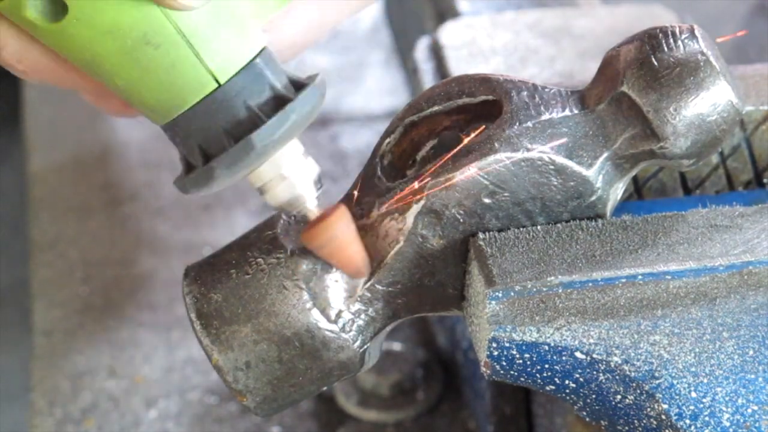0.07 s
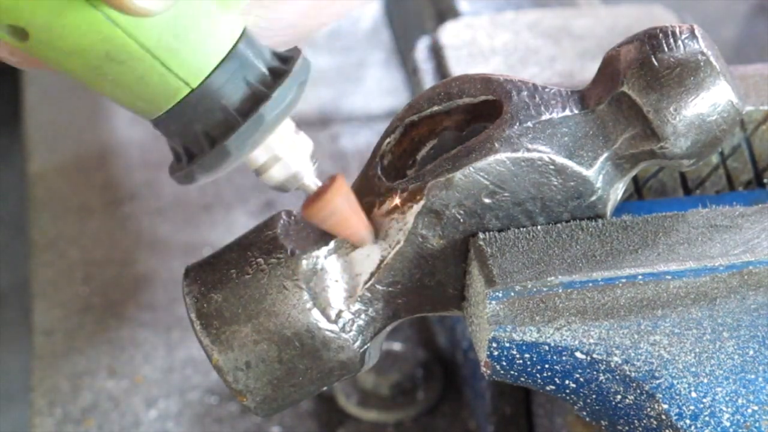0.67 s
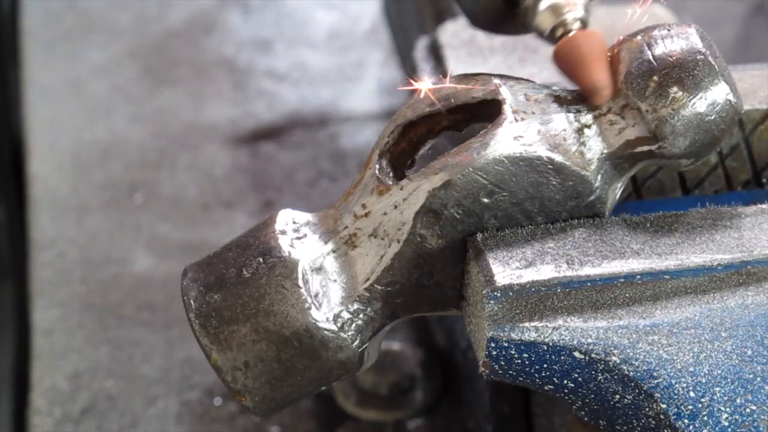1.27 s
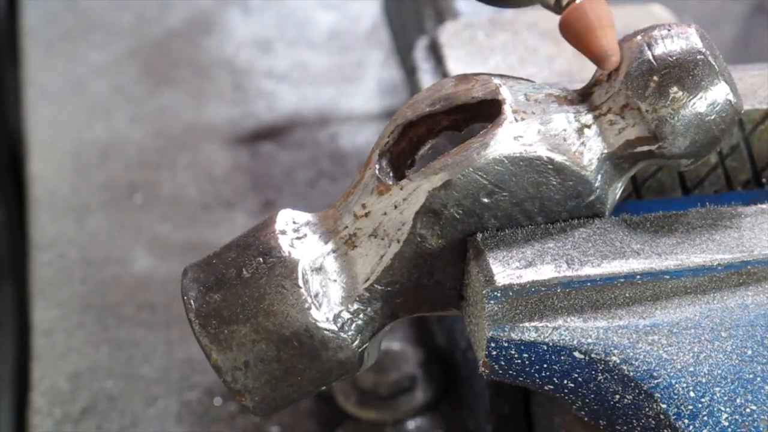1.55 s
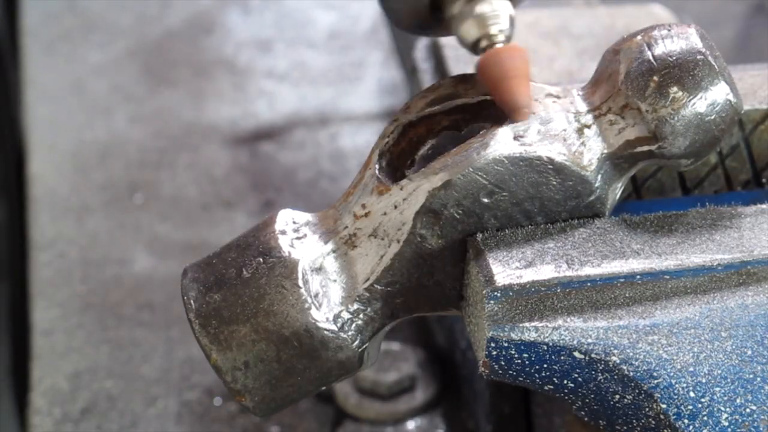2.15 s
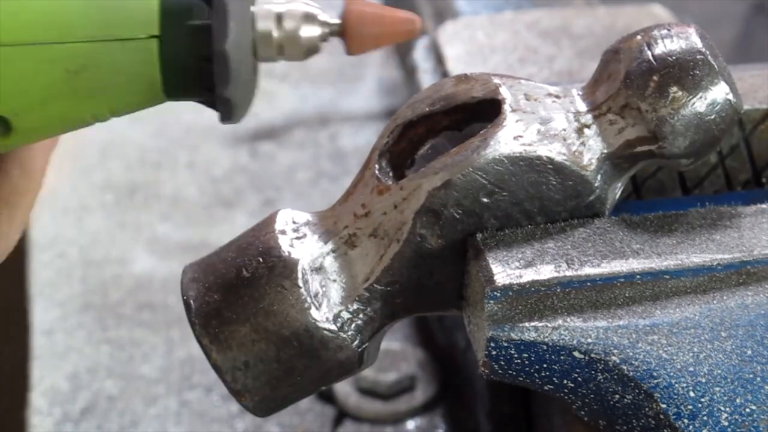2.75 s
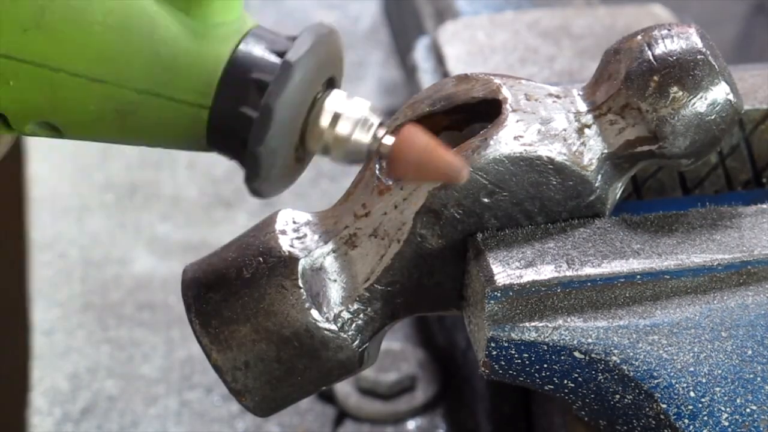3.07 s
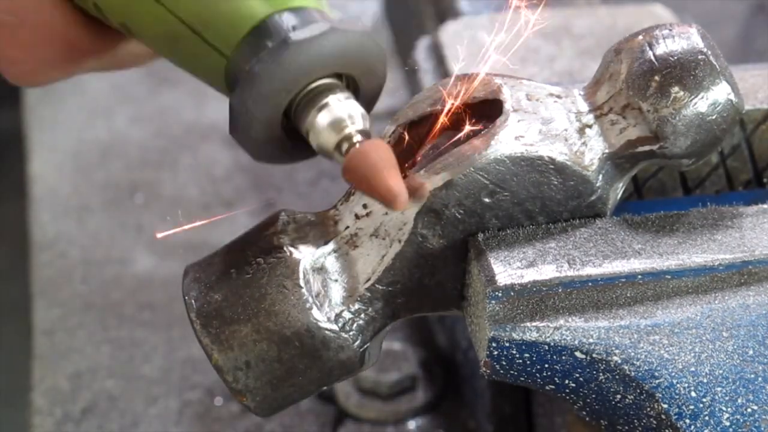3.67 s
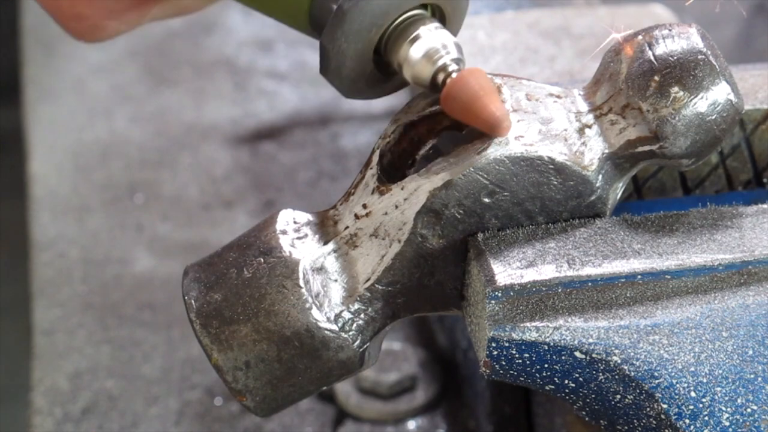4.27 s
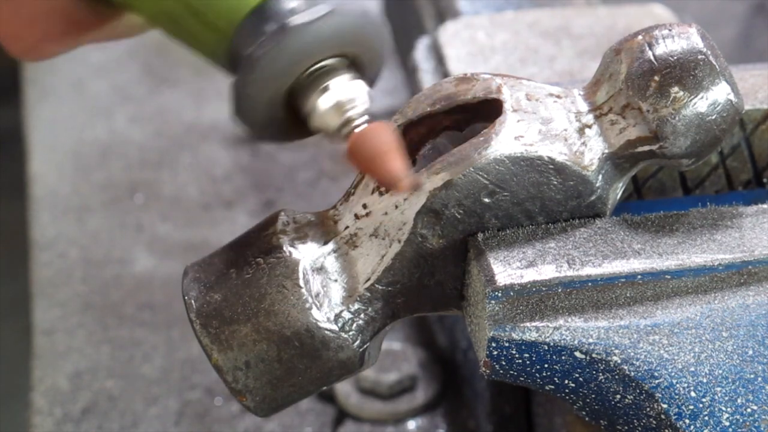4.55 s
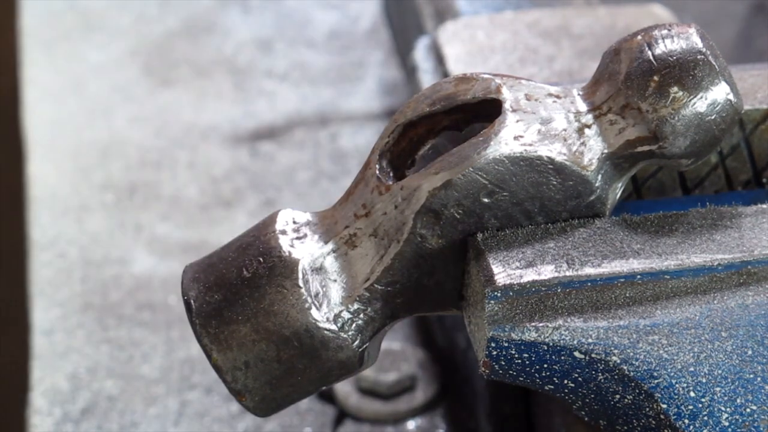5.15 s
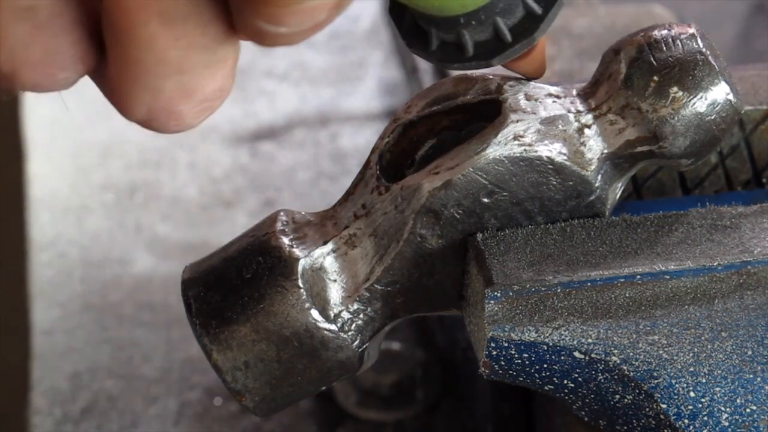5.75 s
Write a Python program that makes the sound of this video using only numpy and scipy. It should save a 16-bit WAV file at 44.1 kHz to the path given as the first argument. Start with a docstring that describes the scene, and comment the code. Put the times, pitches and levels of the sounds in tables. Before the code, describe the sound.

A small electric grinder runs throughout with a high whine and airy fan hiss, heard up close in a workshop. Light scraping on a steel hammer head gives way, after a click, to rough, ringing chatter that slows the motor. The tool spins up freely with a soft puff of air on the microphone, grinds again in gritty, squealing strokes, runs free once more and touches the steel lightly.

```python
"""A handheld rotary tool grinds rust off a steel hammer head held in a vice, in a small workshop.
First the shaft hums, the motor whines and the fan hisses. The stone skips over the hammer's cheek,
scraping and squealing once a turn. At 0.9 s the sound jumps with a click; the stone chatters in the neck,
ringing the steel and dragging the speed down. Lifted, the tool speeds up and its exhaust brushes the
microphone. Last it grinds the eye and the shoulder, runs free again and returns lightly to the eye."""
import sys
import numpy as np
from scipy import signal
from scipy.fft import rfft, irfft
from scipy.io import wavfile
from scipy.ndimage import uniform_filter1d

SR = 44100
rng = np.random.default_rng(int(sys.argv[2]) if len(sys.argv) > 2 else 0)


def to_wav(s):
    """Save 16-bit WAV."""
    ch = np.atleast_2d(s).T  # columns
    pcm = np.round(np.clip(ch, -1, 1) * 32767)  # PCM
    wavfile.write(sys.argv[1], SR, pcm.astype(np.int16))


N = 256220
TIME = np.arange(N) / SR
BINS = np.fft.rfftfreq(N, 1 / SR)
MAINS_HZ = 50
RIPPLE_PHASE = 2 * np.pi * 2 * MAINS_HZ * TIME  # torque ripples at twice the mains frequency
FAN_REF_DB = -45.5  # reference for the fan air and the weaker motor tones

# shaft speed; the pitch steps down abruptly at 0.9 s and elsewhere sags with load: time_s, speed_hz
SHAFT_SPEED = [(0.0, 532), (0.17, 536), (0.31, 521), (0.44, 518), (0.58, 505.5), (0.9, 500.5), (0.905, 490),
               (1.22, 473), (1.4, 450), (1.51, 443.5), (1.55, 459), (1.7, 472), (1.86, 488.5), (2.0, 485.5),
               (2.22, 473), (2.42, 470.5), (2.5, 505), (2.6, 519), (2.78, 532), (3.0, 532), (3.07, 526),
               (3.34, 530), (3.43, 522), (3.58, 488), (3.73, 482), (3.85, 496), (4.02, 488), (4.15, 506),
               (4.28, 489.5), (4.69, 487), (4.85, 474.5), (4.93, 478), (5.1, 511.5), (5.55, 509.5),
               (5.81, 506)]
# level of the vents; it jumps up at 0.9 s and elsewhere follows where they face: time_s, gain_db
VENT_LEVEL = [(0.0, -9), (0.22, -3.5), (0.55, -14.5), (0.9, -12.5), (0.905, -0.5), (1.35, -1), (2.44, -4),
              (2.7, 5), (3.02, 4.5), (3.04, -1), (3.27, 6), (3.55, -0.5), (4.0, 0), (4.5, 1), (4.76, -7.5),
              (5.05, 0.5), (5.37, 4.5), (5.69, 1.5), (5.81, 3.5)]
# balance of the tool's sounds; at 0.9 s the hum drops abruptly, elsewhere it shifts with the grip:
# start_s, change_s, hum_db, loaded_whine_db and companion_db (both relative to the load),
# weak_tones_db and hollow_db (both relative to the fan), free_whine_db
TOOL_BALANCE = [(0.0, 0.03, -37.5, -3, 0, -2, -2, -53), (0.3, 0.052, -36.5, -14, -11, 2, -13, -48),
                (0.46, 0.055, -32.5, -1, -3, 7.5, 2.5, -51), (0.902, 0.0053, -43, -1, -17, -12.5, -15, -48),
                (1.55, 0.023, -66, 1, -14, -12, -25, -51), (1.87, 0.024, -59, 0, -2, -25, -23, -58),
                (2.12, 0.025, -45.5, 3.5, -15, -16, -21, -37), (2.34, 0.067, -60, -8, -5, -4.5, -11, -40),
                (2.62, 0.058, -44, 11, -10, -4.5, -9, -39.5), (2.87, 0.042, -37, 14, -2, 0.5, -4, -38.5),
                (3.02, 0.014, -39, 1.5, -8, -5.5, -6, -40.5),
                (3.38, 0.032, -44.5, -3, -6, -1.5, -28, -54.5),
                (4.08, 0.032, -41.5, -11, -21, -0.5, -25, -53), (4.24, 0.027, -37, -6, -10, -16, -29, -54),
                (4.72, 0.024, -39, -32, -34, -3, -31, -45), (5.06, 0.03, -38, -7, -8, -4.5, -7, -46),
                (5.28, 0.098, -34, -7, -14, 3.5, -1, -43), (5.56, 0.11, -41.5, 5.5, -12, 1, -0.5, -46)]
# presses of the stone on the steel: start_s, end_s, place, scrape_db (3-7 kHz), treble_db (above 7 kHz,
# relative to the scrape), grit_db (relative to the scrape tones), squeal_order, squeal_db
STONE_STROKES = [ (0.14, 0.18, "cheek", -43.5, 3, -7, 8, -55),
                 (0.21, 0.302, "cheek", -44.5, 4.5, -5, 2, -63),
                 (0.325, 0.426, "cheek", -44, 2.5, 3, 3, -65),
                 (0.44, 0.56, "cheek", -41.5, -3, -17, 7, -69),
                 (0.554, 0.628, "cheek", -45, 2, -2, 7, -48.5), (0.652, 0.687, "cheek", -46, 3, -5, 7, -39),
                 (0.695, 0.776, "cheek", -44, -3.5, -13, 8, -52),
                 (0.78, 0.886, "cheek", -42.5, -0.5, -11, 14, -50),
                 (0.903, 1.073, "neck", -37, -1.5, -7, 12, -45),
                 (1.086, 1.242, "neck", -36.5, -12, -8, 8, -51),
                 (1.262, 1.38, "neck", -36.5, -11, -8, 10, -48),
                 (1.383, 1.484, "neck", -33.5, -5.5, -8, 13, -49.5),
                 (1.511, 1.757, "neck", -36.5, 0.5, -14, 6, -53),
                 (1.781, 1.86, "neck", -39, -2.5, -20, 11, -44),
                 (1.864, 2.094, "neck", -37.5, 1.5, -6.5, 12, -38),
                 (2.09, 2.205, "neck", -37, 0.5, -7, 11, -35),
                 (2.209, 2.304, "neck", -37, 0.5, -6, 10, -41),
                 (2.3, 2.403, "neck", -37, -2, -20, 11, -31.5), (3.136, 3.297, "eye", -36, -28, -6, 6, -50),
                 (3.29, 3.471, "eye", -36, -3, -1, 9, -42.5), (3.484, 3.653, "eye", -34, -8, -3, 14, -49),
                 (3.667, 3.79, "eye", -38, -7, -2, 14, -45), (3.838, 3.933, "eye", -35.5, -6.5, -7, 6, -66),
                 (3.946, 4.043, "eye", -39, -6.5, -2, 3, -52.5),
                 (4.089, 4.252, "eye", -33.5, -5, -1.5, 11, -49),
                 (4.254, 4.384, "eye", -33, -4, -14, 12, -42), (4.41, 4.537, "eye", -34.5, -5, 0.5, 8, -46),
                 (4.541, 4.691, "shoulder", -32.5, -1, -4, 12, -56),
                 (4.684, 4.775, "shoulder", -36, 0.5, 3, 11, -39),
                 (4.785, 4.834, "shoulder", -36.5, -0.5, -7, 5, -40),
                 (4.838, 4.875, "shoulder", -31, -3, 0, 13, -36),
                 (5.38, 5.65, "eye", -43, 1.5, 3, 9, -46.5), (5.716, 5.813, "eye", -45.5, 9, -9, 13, -40), ]
# response of the steel at the hammer's shoulder: frequency_hz, gain_db
SHOULDER_RESPONSE = [(280, -25), (700, -17), (980, -12), (1500, -18), (2000, -5.5), (2400, -4),
                     (3000, -4.5), (3500, -9), (4300, -3), (4900, 1.5), (5400, 4), (6300, 6), (6800, 3),
                     (7500, 5.5), (8400, 6.5), (9000, 6), (9700, -5), (11500, -21), (15500, -35)]


def amp(db):
    """Amplitude ratio of a level in decibels."""
    return 10 ** (np.asarray(db) / 20)


def unit_rms(x):
    """The signal scaled to unit mean power."""
    return x / np.sqrt(np.mean(abs(x) ** 2) + 1e-20)


def spectrum(points):
    """A table interpolated over log frequency to every bin."""
    hz, value = np.transpose(points)
    return np.interp(np.log(BINS + 1), np.log(hz), value)


def curve(points):
    """A table interpolated over time to every sample."""
    return np.interp(TIME, *np.transpose(points))


def held(rows):
    """A table's columns at every sample, each row holding until the next slides in."""
    start, change, *columns = np.transpose(rows)
    knots = np.column_stack([start - abs(change) / 2, start + abs(change) / 2]).ravel()[1:]
    return [np.interp(TIME, knots, np.repeat(column, 2)[:-1]) for column in columns]


def filtered(x, gain):
    """Linear filtering: each frequency bin is multiplied by its gain."""
    return irfft(rfft(x) * gain, N)


def noise(gain):
    """White noise through a filter."""
    return filtered(rng.standard_normal(N), gain)


def highpass(hz):
    """Gain that passes only what lies above hz."""
    return 1 / (1 + (hz / (BINS + 1)) ** 16)


def band_rms(x, low_hz, high_hz):
    """RMS amplitude within one band."""
    return np.std(filtered(x, (BINS > low_hz) & (BINS < high_hz)))


def wander(hz):
    """Low-pass random motion of unit RMS, at rates up to about hz."""
    rates = np.fft.rfftfreq(N // 32, 32 / SR)
    knots = irfft(rfft(rng.standard_normal(N // 32)) / (1 + (rates / hz) ** 2))
    return np.interp(TIME, np.linspace(0, TIME[-1], len(knots)), unit_rms(knots))


def sway(db, hz):
    """Random amplitude modulation, spanning db either way."""
    return unit_rms(amp(db * np.tanh(wander(hz))))


def shaft_angle(flutter=0.001946, flutter_hz=28):
    """Phase is the integral of speed; inertia rounds the speed's changes and a slight flutter remains."""
    speed = uniform_filter1d(curve(SHAFT_SPEED), size=1000)
    return 2 * np.pi * np.cumsum(speed * (1 + flutter * wander(flutter_hz))) / SR


def hum(angle, load, db_per_hz=0.2964, knee_hz=483.7, reference_hz=512.7, shake_hz=12):
    """Rotating unbalance radiates at the shaft frequency, louder at speed and shaken by contact."""
    speed, vent_db = curve(SHAFT_SPEED), curve(VENT_LEVEL)
    level_db = held(TOOL_BALANCE)[0] + db_per_hz * (np.maximum(speed, knee_hz) - reference_hz)
    sideband = amp(-22 + 0.55 * vent_db) * np.sin(angle + RIPPLE_PHASE)
    steady = amp(level_db + 0.59 * vent_db) * sway(db=2, hz=12.3) * (np.sin(angle) + sideband)
    shake_level = np.hypot(amp(-62), amp(-29) * load)
    shake = wander(shake_hz) * np.sin(angle) + wander(shake_hz) * np.cos(angle)
    return np.sqrt(2) * (steady + shake_level * shake)


def whine(angle, load, waver_db=3, loaded_waver_db=8, slip_rad=0.5, ripple_depth=0.19):
    """Shaft harmonics, modulated by torque ripple; the 7th and 8th grow with the load."""
    # weaker motor tones, before the housing: shaft_order, relative_db
    weak_tones = [(2, -6.5), (3, -8.5), (4, -10), (5, -11), (6, -10), (7, -7.5), (9, 0), (10, -4), (11, 1),
                  (12, -1), (14, -1)]
    # thin high whistles, before vent level and housing: shaft_order, level_db
    whistles = [(16, -48), (18, -52.5)]
    # response of the plastic housing: frequency_hz, gain_db
    housing = [(900, -30), (1020, -5), (1350, -2), (1560, 4), (2500, -5.5), (7400, -4), (8150, -0.5),
               (8600, -9), (9000, 0.5), (9500, -0.5)]
    _, loaded_db, companion_db, weak_db, _, free_db = held(TOOL_BALANCE)
    vent_db = curve(VENT_LEVEL)
    # phase modulation spreads the free whine into sidebands, widest at high speed
    swing_rad = np.interp(curve(SHAFT_SPEED), [480, 530], [0.35, 1.2])
    tones = amp(free_db) * np.sin(8 * angle + swing_rad * np.sin(RIPPLE_PHASE)) * sway(waver_db, 25)
    loaded_level = load * amp(loaded_db) * sway(loaded_waver_db, 34)
    tones += loaded_level * np.cos(8 * angle + slip_rad * wander(45))
    companion_level = load * amp(companion_db) * sway(loaded_waver_db, 33)
    tones += companion_level * np.sin(7 * angle + slip_rad * wander(40))
    for order, db in weak_tones:
        level = amp(FAN_REF_DB + vent_db + weak_db + db) * sway(waver_db, 34)
        tones += level * np.sin(order * angle + 2 * np.pi * rng.random() + slip_rad / 2 * wander(40))
    for order, db in whistles:
        tones += amp(db + vent_db) * sway(waver_db, 25) * np.sin(order * angle + 2 * np.pi * rng.random())
    ripple = unit_rms(1 + ripple_depth * np.cos(RIPPLE_PHASE))
    return np.sqrt(2) * filtered(tones, amp(spectrum(housing))) * ripple


def fan(trim_db=-2, ripple_depth=0.03, hollow_hz=1360, hollow_width_hz=670):
    """Turbulence hisses at the vents, with a cavity resonance where the hand cups them."""
    # spectrum of the cooling air: frequency_hz, density_db
    air_spectrum = [(60, -20), (330, -15.5), (480, -8.5), (760, -8), (1050, -1.5), (1600, 2.5), (2200, 6),
                    (3100, 2), (4400, 3.5), (6000, 8.5), (8400, 3.5), (9600, -2), (11500, -14),
                    (15500, -29.5)]
    air = noise(amp(spectrum(air_spectrum)))
    air /= band_rms(air, 1100, 2800)
    hollow = unit_rms(noise(1 / (1 + (2 * (BINS - hollow_hz) / hollow_width_hz) ** 4)))
    hollow_db = held(TOOL_BALANCE)[4]
    level = amp(FAN_REF_DB + curve(VENT_LEVEL) + trim_db) * (1 + ripple_depth * np.cos(RIPPLE_PHASE))
    return level * (air + amp(hollow_db) * hollow)


def workshop_rumble(level_db=-76, incoherent_db=-16):
    """Ambient noise: a faint low rumble, nearly the same in both channels."""
    # spectrum of the rumble: frequency_hz, density_db
    rumble_spectrum = [(20, -3.5), (48, 5), (90, -8), (140, -7), (180, 2), (230, -23), (280, 3), (380, -34),
                       (1000, -43), (15000, -44)]
    white = rng.standard_normal(N) + amp(incoherent_db) * rng.standard_normal((2, N))
    return amp(level_db) * unit_rms(filtered(white, amp(spectrum(rumble_spectrum))))


def reverberation(x, response, t60_s, echoes_per_s=3000):
    """Diffuse reflections decay exponentially, in a different pattern in each channel."""
    echoes = rng.standard_normal((2, N)) * (rng.random((2, N)) < echoes_per_s / SR)
    echoes = echoes * amp(-60 * TIME / t60_s) * (TIME > 0.002)
    echoes /= np.linalg.norm(echoes, axis=1, keepdims=True)
    tail = filtered(echoes, amp(spectrum(response)))[:, :SR // 2]
    return signal.fftconvolve(x[None], tail, axes=1)[:, :N]


def contact(start_s, end_s, attack_s=0.017, release_s=0.023, graze_db=-14, graze_s=0.045):
    """Contact pressure rises and relaxes exponentially; the stone still grazes as it lifts."""
    after, graze = np.maximum(TIME - end_s, 0), amp(graze_db)
    bite = 1 - np.exp(-np.clip(TIME - start_s, 0, 1) / attack_s)
    release = (1 - graze) * np.exp(-np.minimum(after, 2) / release_s)
    return bite * (release + graze * np.exp(-after / graze_s))


def skipping(depth=0.3, rate_hz=28):
    """A lightly held stone skips unevenly, modulating the contact pressure."""
    return unit_rms(1 + depth * np.cos(2 * np.pi * rate_hz * TIME + 2.9 * wander(15)))


def stone_profile(angle, bump_phases, drift=0.65, drift_hz=20, slip=0.35, slip_hz=60):
    """Periodic forcing: bumps pass every turn; the contact drifts, so each harmonic swells alone."""
    force = np.zeros(N)
    for order in range(2, len(bump_phases)):
        smear = slip * order / 10
        gain = 1 + drift * (wander(drift_hz) + 1j * wander(drift_hz)) + 1j * smear * wander(slip_hz)
        harmonic = (gain * np.exp(1j * (order * angle + bump_phases[order]))).real
        force += harmonic / np.sqrt(1 + 2 * drift ** 2 + smear ** 2)
    return unit_rms(force)


def grit(angle, turn_depth=0.27, grain_db=1.5):
    """Abrasion noise: grains tear at the rust, hardest when the stone's high side comes round."""
    grains = rng.standard_normal(N) * amp(grain_db * np.minimum(rng.exponential(1, N), 5))
    return unit_rms(grains * (1 + turn_depth * np.cos(angle)))


def steel(force, response, split_hz=7000):
    """Forced vibration of the steel at one place, as body and treble, each normalised."""
    sound = filtered(force, amp(spectrum(response)))
    treble = filtered(sound, highpass(split_hz))
    return np.array([(sound - treble) / band_rms(sound, 3000, split_hz), unit_rms(treble)])


def scrape(profile, grains, pressures, bounce_db=0.86, flicker_db=1.0, bounce_hz=28):
    """Source and filter: bumps and grit drive the steel at each press as the tool bounces in the hand."""
    # response of the steel at three places on the hammer: frequency_hz, gain_db
    cheek = [(700, -41), (1000, -10), (1500, 6), (2000, -0.5), (2500, 2), (3050, -8.5), (3550, 1),
             (4500, 6), (5300, -0.5), (6400, 6.5), (7100, 1), (7800, 1), (8600, 3.5), (9200, 4),
             (10300, -15), (12000, -24), (15500, -38)]
    neck = [(180, -28), (275, -7.5), (380, -36), (750, -25), (950, -16), (1400, -6), (1900, -2), (2400, -4),
            (2850, -3), (3400, -1), (4300, 0.5), (4800, 5), (5450, 5.5), (6050, 7.5), (6750, -7),
            (7200, -5), (8300, -2.5), (9600, -14.5), (11500, -26), (15500, -46)]
    eye = [(100, -37), (280, -17.5), (700, -17), (980, -7), (1500, -11.5), (2000, -1), (2400, -2.5),
           (3000, 1), (3500, -6.5), (4300, -6), (4900, 6.5), (5900, -0.5), (6600, 4.5), (8400, 4.5),
           (9500, 1), (11500, -14.5), (15500, -33)]
    places = {"cheek": cheek, "neck": neck, "eye": eye, "shoulder": SHOULDER_RESPONSE}
    vibration = {place: (steel(profile, response), steel(grains, response))
                 for place, response in places.items()}
    bounce = unit_rms(amp(bounce_db * wander(bounce_hz)))
    flicker = unit_rms(amp(flicker_db * wander(bounce_hz)))
    out = np.zeros(N)
    for (_, _, place, scrape_db, treble_db, grit_db, _, _), pressure in zip(STONE_STROKES, pressures):
        tones, rasp = vibration[place]
        body, treble = (tones + amp(grit_db) * rasp) / np.hypot(1, amp(grit_db))
        out += pressure * amp(scrape_db) * (body + amp(treble_db) * flicker * treble)
    return bounce * out


def squeal(angle, bump_phases, pressures, slip_rad=0.75):
    """Friction makes the steel sing at one shaft harmonic, growing with the square of the pressure."""
    out = np.zeros(N)
    drag = slip_rad * wander(36)
    for (*_, order, db), pressure in zip(STONE_STROKES, pressures):
        out += amp(db) * pressure ** 2 * np.cos(order * angle + bump_phases[order] + drag)
    return np.sqrt(2) * sway(db=4, hz=25) * out


def ringing(swell_db=4, swell_hz=11):
    """Randomly struck modes ring as narrow bands of noise, swelling as the contact point moves."""
    # resonances of the hammer head: pitch_hz, width_hz, level_db
    modes = [(3720, 60, -7), (4920, 55, -3), (5820, 60, -2.5), (6230, 65, 2), (7110, 55, -4),
             (7830, 65, -2), (8130, 75, -3), (8480, 45, -5)]
    out = np.zeros(N)
    for pitch_hz, width_hz, db in modes:
        phase = 2 * np.pi * pitch_hz * TIME
        level = amp(db) * sway(swell_db, swell_hz)
        out += level * (wander(width_hz / 2) * np.cos(phase) + wander(width_hz / 2) * np.sin(phase))
    return unit_rms(out)


def click_and_snags(ring, ring_db=-2):
    """Decaying transients: a click as the sound jumps at 0.9 s, then short rasping snags of the stone."""
    # the click, then the snags: start_s, level_db, decay_s
    transients = [(0.904, -33, 0.0079), (1.055, -34, 0.0068), (1.149, -29, 0.0061), (1.2, -30.5, 0.012),
                  (1.233, -28.5, 0.0061), (2.228, -28, 0.011), (3.021, -30, 0.007), (5.67, -24.5, 0.0071)]
    envelope = sum(amp(db) * (TIME >= start) * np.exp(-abs(TIME - start) / decay)
                   for start, db, decay in transients)
    rasp = unit_rms(noise(amp(spectrum(SHOULDER_RESPONSE))))
    return unit_rms(rasp + amp(ring_db) * ring) * envelope


def hum_dips():
    """Amplitude modulation of the hum: its level dips briefly now and then, and once swells."""
    # bell-shaped changes of level: centre_s, gain_db, half_width_s
    dips = [(0.96, -10, 0.025), (1.2, -11.5, 0.02), (1.34, -11, 0.024), (2.42, -7, 0.016), (2.5, 4, 0.0072),
            (3.05, -5.5, 0.029), (3.78, -9, 0.0062), (3.905, -3, 0.019), (4.197, -14, 0.009),
            (4.42, -12.5, 0.063), (4.815, -0.5, 0.02), (4.957, -20, 0.0065), (5.035, -15, 0.012),
            (5.645, -12, 0.011), (5.73, -3, 0.011), (5.78, -11, 0.0067)]
    return amp(sum(db * np.exp(-np.minimum(abs(TIME - centre) / width, 5) ** 2)
                   for centre, db, width in dips))


def exhaust_puffs():
    """Wind noise: the fan's exhaust sweeps the microphone with low, soft pressure fluctuations."""
    # buffets of air: start_s, level_db, length_s, cutoff_hz
    puffs = [(2.651, -49.5, 0.1, 990), (2.815, -53, 0.15, 304), (3.087, -62, 0.14, 70),
             (5.15, -75, 0.69, 90)]
    out = np.zeros(N)
    for start, db, length, cutoff_hz in puffs:
        rumble = unit_rms(noise(1 / (1 + (BINS / cutoff_hz) ** 4)))
        out += amp(db) * rumble * np.sin(np.pi * np.clip((TIME - start) / length, 0, 1)) ** 2
    return out


def scene(skid_rad=0.055, skid_hz=60, ring_db=-4):
    """Superposition: tool and steel follow one shaft angle, and the bench and the room answer."""
    # chatter of the stone, strongest when wedged in the neck: time_s, share (0-1)
    chatter_share = [(0.9, 0), (0.905, 1), (1.75, 1), (1.9, 0.4), (2.3, 0.35), (2.4, 0.1), (3.2, 0.2),
                     (3.4, 0.45), (4.05, 0.45), (4.25, 0.2)]
    # grinding passed on by vice and bench: frequency_hz, gain_db (relative to the direct sound)
    bench_response = [(200, -30), (600, -36), (1100, -29), (2000, -15), (2800, -6.5), (4000, -7),
                      (15000, -29)]
    # reflections of the room: frequency_hz, gain_db (relative to the direct sound)
    room_response = [(500, -21), (1100, -37.5), (2500, -33.5), (4500, -1), (8000, -9.5), (15000, 6.5)]
    angle, chatter = shaft_angle(), curve(chatter_share)
    skid = skid_rad * chatter * wander(skid_hz)  # a chattering stone meets the steel early or late
    bump_phases = 2 * np.pi * rng.random(size=33)  # one for each harmonic of the stone's outline
    profile = stone_profile(angle + skid, bump_phases)
    grains, ring, skip = grit(angle), ringing(), skipping()
    pressures = [contact(start, end) * (skip if place == "cheek" else 1)
                 for start, end, place, *_ in STONE_STROKES]
    load = sum(amp(scrape_db) * pressure
               for (_, _, _, scrape_db, *_), pressure in zip(STONE_STROKES, pressures))
    grinding = scrape(profile, grains, pressures) + squeal(angle + skid / 2, bump_phases, pressures)
    grinding += click_and_snags(ring) + amp(ring_db) * chatter * load * ring
    direct = grinding + hum(angle, load) * hum_dips() + whine(angle, load) + fan()
    buffets = amp([[5], [-3]]) * exhaust_puffs()  # strongest on the left
    bench = reverberation(grinding, bench_response, t60_s=0.13)
    room = reverberation(direct, room_response, t60_s=0.16)
    return direct + bench + room + buffets + workshop_rumble()


def record(dry, cutoff_hz=15650):
    """Stereo image: treble differs between left and right, bass is centred; a low-pass follows."""
    # level difference between the channels: frequency_hz, left_minus_right_db
    balance = [(2700, -1), (3600, 1), (4700, 2.5), (6200, 2), (7200, -8.5), (8400, -12.5), (9800, -10.5),
               (12000, -9), (15000, -8)]
    # phase difference between the channels: frequency_hz, left_lead_rad
    phase_lead = [(3000, 1), (4200, 0.48), (5200, -0.39), (6500, -1.52), (8200, -1.07), (10000, -0.88),
                  (15000, -0.71)]
    treble = highpass(2500)
    left = amp(treble * spectrum(balance)) * np.exp(1j * treble * spectrum(phase_lead))
    channels = np.array([left, np.ones_like(left)]) * 2 / abs(1 + left)  # their mean has unit gain
    lowpass = signal.firwin(511, cutoff_hz, window=("kaiser", 9), fs=SR)
    return signal.oaconvolve(filtered(dry, channels), lowpass[None], "same")


dry = scene()
out = record(dry)
to_wav(out)
```